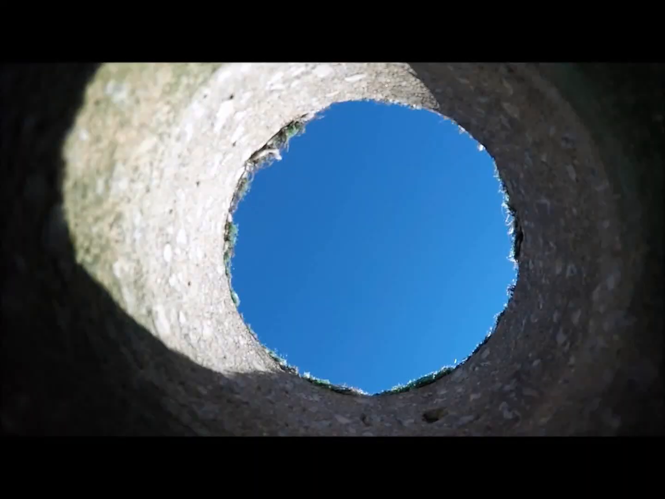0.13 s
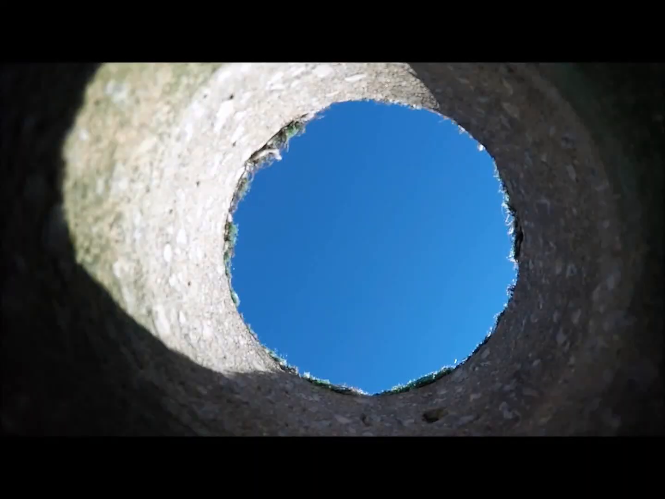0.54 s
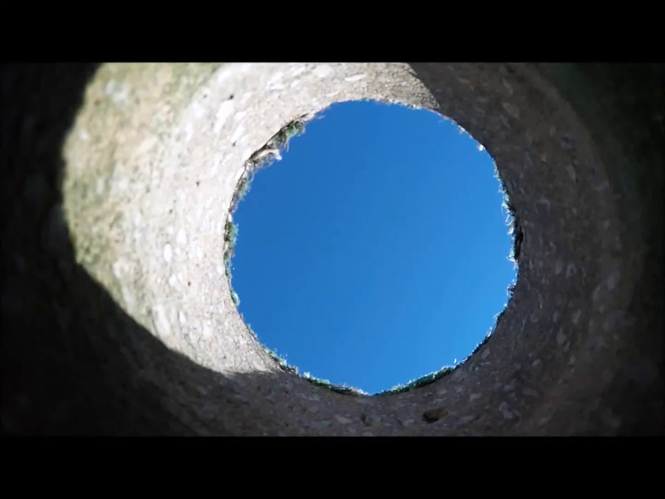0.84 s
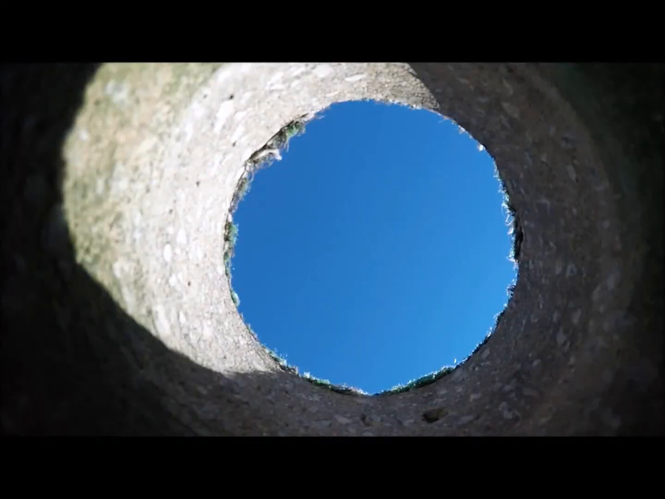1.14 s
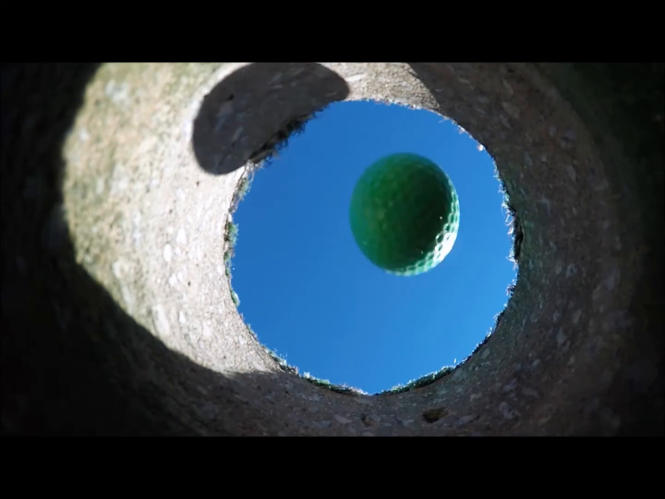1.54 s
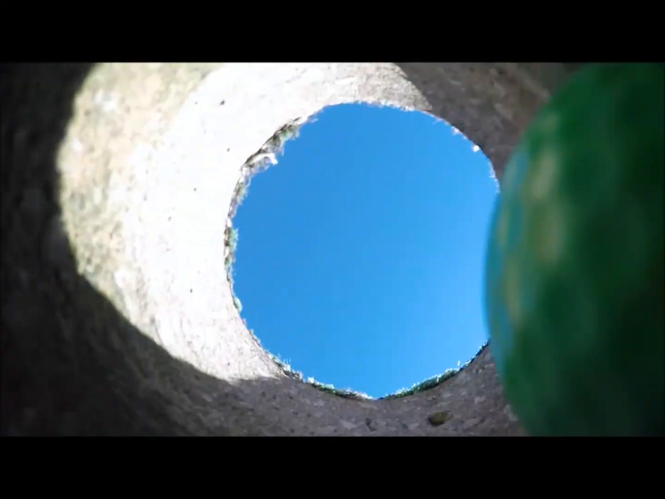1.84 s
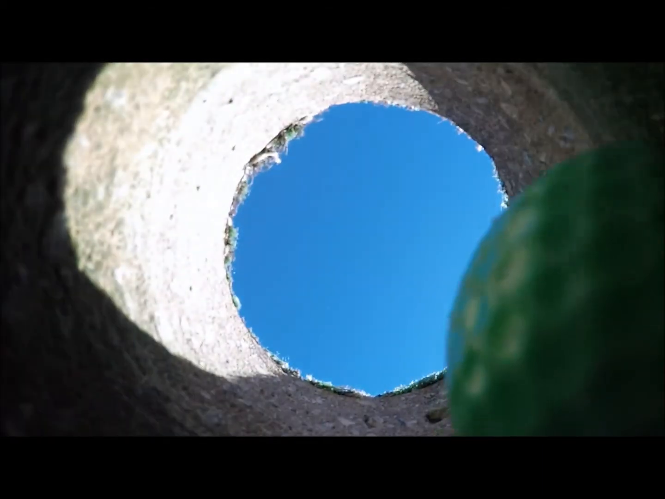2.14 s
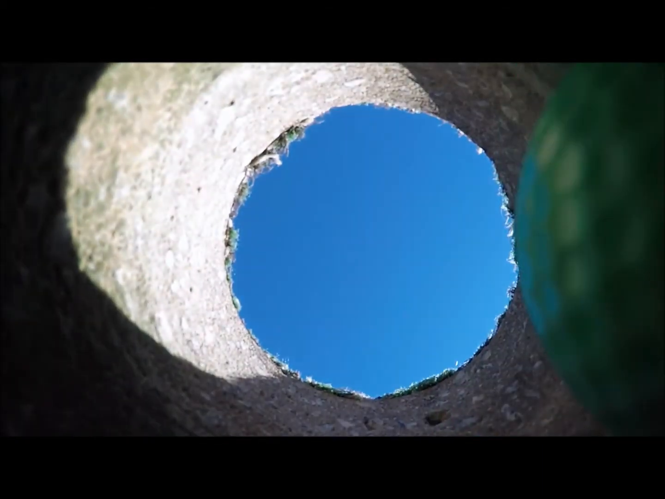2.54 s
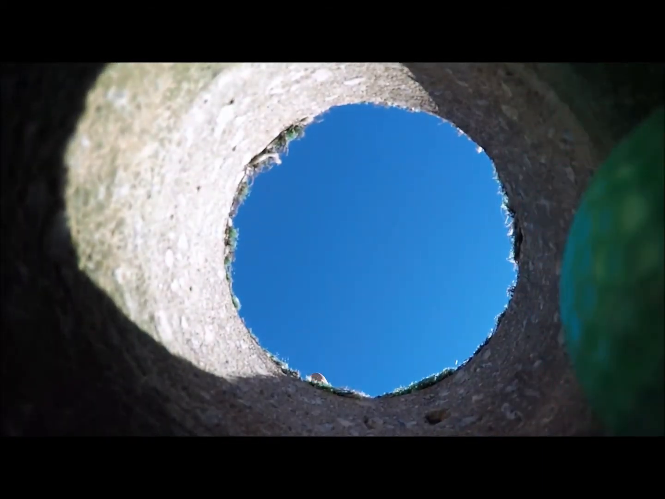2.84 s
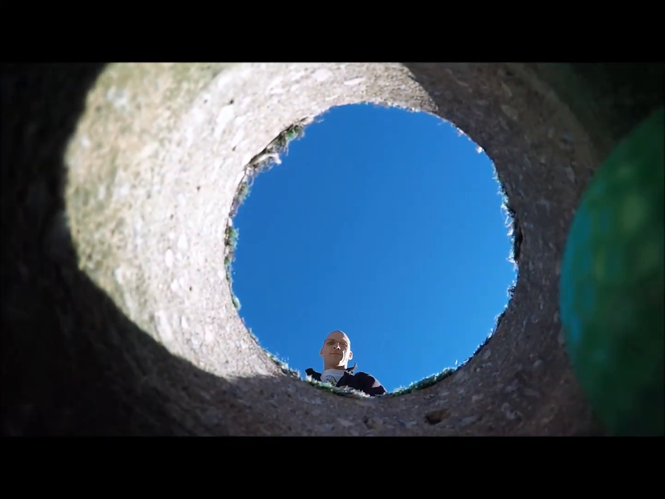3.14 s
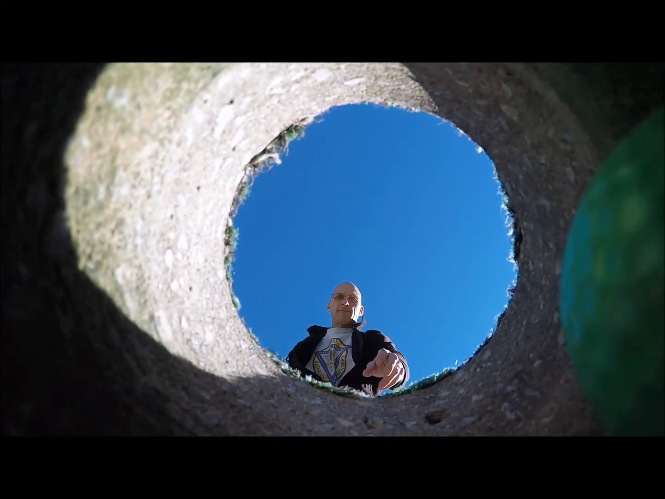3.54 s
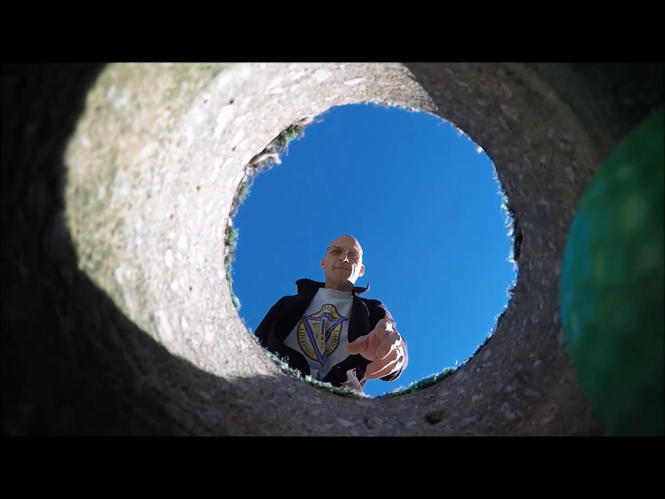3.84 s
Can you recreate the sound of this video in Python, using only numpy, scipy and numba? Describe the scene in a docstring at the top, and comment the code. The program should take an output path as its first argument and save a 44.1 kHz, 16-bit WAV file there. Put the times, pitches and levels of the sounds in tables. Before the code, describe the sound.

A golf ball drops into a hole, knocking hard and rattling to rest over low traffic rumble.

```python
"""Heard by a small camera lying at the bottom of a golf hole: traffic rumble (swelling noise bands, a drone, a whine)
runs throughout, and a distant hoarse bird (throbbing noise on a gliding tone) cries once at about 1 s.
From 1.5 s a ball drops in: hard knocks (damped sines and noise clicks) overload the microphone's converter, with ticks,
grit noise and low jolts of the camera, then rattles of closing rebounds until 2.8 s.
The gain control ducks after the blows and creeps back; at 3.8 s a step (a soft damped tone) lands beside the hole."""
import sys
import numpy as np
from scipy import signal
from scipy.fft import rfft, irfft
from scipy.io import wavfile
from scipy.ndimage import uniform_filter1d
from numba import njit

SR = 44100
rng = np.random.default_rng(int(sys.argv[2]) if len(sys.argv) > 2 else 0)


def gain_from_decibels(decibels):
    """Convert decibel values to linear amplitude factors."""
    exponent = np.asarray(decibels, float) / 20
    return 10 ** exponent


def store_wav(level_fs):
    """Save 16-bit WAV to argv[1]."""
    pcm = np.round(np.clip(np.atleast_2d(level_fs), -1, 1) * 32767)
    wavfile.write(sys.argv[1], SR, pcm.T.astype(np.int16))


N = 176400  # samples, 4 s


def decay(t, t60):
    """Envelope that falls 60 dB in t60 s."""
    return np.exp(-np.log(1000) * t / t60)


def sine(hz, t):
    """Steady tone starting at zero phase."""
    return np.sin(2 * np.pi * hz * t)


def level(x, db):
    """Scale to an rms level."""
    return x * gain_from_decibels(db) / np.sqrt(np.mean(x ** 2))


def add(out, s, x):
    """Mix x in at time s."""
    i = int(s * SR)
    out[i:i + len(x)] += x[:len(out) - i]


def walk(rate):
    """Random levels held 1 / rate s and slewed twice."""
    hold = int(SR / rate)
    steps = np.repeat(rng.standard_normal(N + 1)[:N // hold + 1], hold)
    return 0.76 * uniform_filter1d(uniform_filter1d(steps, hold), hold)[:N]


def shaped(gain):
    """Noise with the amplitude spectrum gain(Hz)."""
    hz = np.arange(N // 2 + 1) * SR / N + 1  # 1 Hz up, to keep clear of zero
    return irfft(rfft(rng.standard_normal(N)) * gain(hz), N)


def peak(centre_hz, width_hz):
    """Noise gathered round one pitch, half amplitude at the edges of its width."""
    return shaped(lambda f: 1 / (1 + ((f - centre_hz) / width_hz * 2) ** 2))


def ring(t, modes, chance):
    """Damped modes; chance shifts the level and pitch of each."""
    scatter_db, scatter_pitch = 3.5, 0.02
    out = 0
    for (hz, db, t60), (c, d) in zip(modes, chance):
        out = out + gain_from_decibels(db + scatter_db * c) * decay(t, t60) * sine(hz * (1 + scatter_pitch * d), t)
    return out


# Spectrum of the traffic as it reaches the bottom of the hole: (frequency [Hz], relative density [dB per Hz])
TRAFFIC_SPECTRUM = [(15, -41.5), (25, -8), (69, -5), (101, -2.5), (132, -0.5), (172, -9.5), (257, -8.5),
                    (374, -7.5), (477, -14), (545, -26.5), (712, -34), (1010, -37), (1320, -42.5),
                    (2260, -46.5), (2950, -52.5), (4530, -57), (6770, -66), (8610, -66), (15100, -74.5)]


def traffic():
    """Octave bands that swell together and flicker alone, an engine drone and a faint high whine."""
    rumble_db, drone_db, whine_db = -24, -28.5, -80  # rms; the drone then wavers
    hz, db = np.array(TRAFFIC_SPECTRUM).T
    rumble, swell = 0, walk(0.81)
    for mid in 30 * 2. ** np.arange(10):
        lowest = -1 if mid > 30 else 0  # the bottom band stays open downwards

        def band_gain(f):
            crossfade = np.cos(np.pi / 2 * np.clip(np.log2(f / mid), lowest, 1))
            return gain_from_decibels(np.interp(np.log(f), np.log(hz), db)) * crossfade

        rumble = rumble + shaped(band_gain) * gain_from_decibels(0.52 * swell + 0.24 * walk(6))
    drone = level(peak(77.7, 12), drone_db) * gain_from_decibels(0.8 * walk(1.1))
    whine = level(peak(8440, 120), whine_db)
    return level(rumble, rumble_db) + drone + whine


# Track of the distant bird's cry: (time [s], centre frequency [Hz], rms level [dB])
BIRD_TRACK = [(0.839, 1550, -66), (.87, 1650, -47.5), (.92, 1950, -45), (0.999, 2088, -48),
              (1.061, 1950, -53.5), (1.2, 1800, -66)]


def bird():
    """A distant rasping cry: throbbing noise on a tone that rises and sags."""
    width_hz, rasp_hz = 420, 85
    t = np.arange(N) / SR
    s, hz, db = np.array(BIRD_TRACK).T
    rough = shaped(lambda f: 1 / (1 + (f / width_hz * 2) ** 4)) * (1 + 0.27 * sine(rasp_hz, t))
    tone = np.sin(2 * np.pi * np.cumsum(np.interp(t, s, hz)) / SR)
    return level(rough * tone, 0) * gain_from_decibels(np.interp(t, s, db, -120, -120))


def step():
    """A step close beside the hole rings its air softly: one damped tone with a rounded start."""
    time_s, db, hz, rise_s, t60_s = 3.8245, 9.5, 420, 0.0035, 0.023
    out, t = np.zeros(N), np.arange(4096) / SR
    rise = (1 - np.exp(-t / rise_s)) ** 2
    add(out, time_s, gain_from_decibels(db) * rise * decay(t, t60_s) * sine(hz, t))
    return out


# Grit under the rolling ball, the last a shoe scuffing turf, before the scrape's unevenness:
# (time [s], length [s], level [dB])
SCRAPES = [(1.753, 0.059, -35.5), (1.822, 0.07, -38), (1.918, 0.041, -43), (2.39, 0.089, -46),
           (2.654, 0.036, -22.5), (3.826, 0.038, -55)]


def grit():
    """Uneven scraping noise that starts quickly and thins out."""
    low_hz, top_hz, uneven_db = 800, 4000, 9
    t = np.arange(N) / SR
    shape = 0
    for s, span, db in SCRAPES:
        shape = shape + gain_from_decibels(db) * np.interp(t, [s, s + .004, s + span], [0, 1, .3], 0, 0)
    scrape = shaped(lambda f: f / low_hz / (1 + f / low_hz) / (1 + (f / top_hz) ** 4))
    return shape * gain_from_decibels(uneven_db * walk(400)) * level(scrape, 0)


# Shoves of the camera body, the level before its rise and decay: (time [s], level [dB], swing frequency [Hz])
CAMERA_SHOVES = [(1.679, -8.5, 51.4), (1.743, 10, 67), (1.82, 10.5, 56), (1.883, 9.5, 60),
                 (2.322, -2.5, 58.7), (2.466, -2, 60), (2.66, -12.5, 60.4)]


def shoves():
    """The jolted camera swings low and dies away within a few swings."""
    rise_s, t60_s = 0.00079, 0.069
    out, t = np.zeros(N), np.arange(8192) / SR
    for s, db, hz in CAMERA_SHOVES:
        add(out, s, -gain_from_decibels(db) * (1 - np.exp(-t / rise_s)) * decay(t, t60_s) * sine(hz, t))
    return out


# Thin ticks after the big blows: (time [s], relative level [dB])
TICK_TIMES = [(1.7748, -9.5), (1.793, -23), (1.8455, -10), (1.9189, -6.5), (1.982, -9)]
# Modes that each tick rings: (frequency [Hz], relative level [dB], t60 [s])
TICK_MODES = [(2090, 3.5, .006), (5600, 0.5, 0.0052)]


def ticks():
    """Noise bursts of 3 ms, each ringing two short modes."""
    out, t = np.zeros(N), np.arange(4096) / SR
    for s, db in TICK_TIMES:
        touch = rng.standard_normal(len(t)) * (t < .003)
        tick = signal.fftconvolve(touch, ring(t, TICK_MODES, np.zeros((2, 2))))[:len(t)]
        add(out, s, gain_from_decibels(db) * tick / 30)
    return out


# Knocks of the ball at the camera; a gap of 1 ms or less gives no rebounds:
# (time [s], relative level [dB], knock frequency [Hz], treble against the knock [dB], first rebound gap [s])
BALL_KNOCKS = [(1.517, -30, 454, -22, 0.0004), (1.671, 7.5, 351.4, -19.5, 0), (1.676, -10.5, 400, -6, 0),
               (1.7406, 17, 624, -8, 0.00098), (1.743, 5.5, 810, -2, 0.0038), (1.7525, 5.5, 640, -17, 0),
               (1.8165, 18.5, 444, -6.5, 0.00046), (1.8236, -8.5, 900, -2, 0),
               (1.8802, 19.5, 470, -11, 0.0017), (1.8904, 14.5, 487, -13.5, 0.0031),
               (1.8997, 7.5, 460, -14.5, 0), (1.9058, 8.5, 450, -12.5, 0), (1.9115, -1, 440, -11, 0.0016),
               (1.9295, 5.5, 430, -12.5, 0.002), (1.9367, -6.5, 431, -16, .0075),
               (1.9711, 2, 420, -8, 0.00079), (1.976, -15.5, 420, -8.5, .005),
               (2.129, -11.5, 450, -11, .004), (2.2917, -15.5, 450, -9.5, 0.0027),
               (2.2948, -7, 447, -18, .003), (2.3213, 17, 466, -14.5, .008),
               (2.3808, -13.5, 450, -8, 0.0019), (2.386, 5.5, 484, -16, 0.0036),
               (2.4637, 16, 896, -25, 0.0015), (2.4732, 1.5, 437, -20, 0.0022),
               (2.493, -8, 400, -29.5, 0.0044), (2.609, -17, 400, -24, 0), (2.6568, 4.5, 408, -21, .006),
               (2.671, 10.5, 460, -18.5, 0.0014), (2.678, 1, 370, -21, .0054),
               (2.811, -4, 400, -14.5, 0.00067), (2.818, -3, 380, -25.5, .0052)]
# Modes of cup and casing, before each blow's scatter: (frequency [Hz], relative level [dB], t60 [s])
CUP_MODES = [(760, 9.5, .012), (1018, 7.5, 0.0089), (1370, 3.5, 0.0093), (1850, -4, 0.0042),
             (2415, 3, 0.0072), (3060, -1, 0.011), (4070, -3.5, 0.015), (4767, -1, 0.0099),
             (5367, -4, 0.012), (7500, -12.5, .006)]


def knock(t, hz):
    """The dull body of a blow: a damped knock and the air of the hole, pushed in smoothly."""
    cycles, push_s = 5.68, 0.0014  # cycles of the knock in its t60
    hole_hz, hole_db, hole_t60_s = 380, -16, 0.035
    push = 1 - np.exp(-t / push_s)
    dull = decay(t, cycles / hz) * sine(hz, t)
    hole_air = gain_from_decibels(hole_db) * decay(t, hole_t60_s) * sine(hole_hz, t)
    return -3 * push ** 1.1 * (dull + hole_air)


def click(t, blow_db, chance, noise):
    """A gritty touch rings cup and casing beside a noise crack; harder blows keep more treble."""
    touch_s, modes_db = 0.0005, -6.5  # touch_s: fall of the touch to 1/e
    crack_db, crack_t60_s, tail_db, tail_t60_s = -6, 0.007, -37, 0.055
    treble_hz, octaves_per_db = 5600, 0.022  # top of the treble at 0 dB, its rise with level
    touch = (0.5 + noise[:256]) * np.exp(-t[:256] / touch_s)
    touch = touch / np.sqrt(np.sum(touch ** 2))
    modes = np.convolve(ring(t, CUP_MODES, chance), touch)[:len(t)] * gain_from_decibels(modes_db)
    crack = noise * (gain_from_decibels(crack_db) * decay(t, crack_t60_s) + gain_from_decibels(tail_db) * decay(t, tail_t60_s))
    top_hz = np.clip(treble_hz * 2 ** (octaves_per_db * blow_db), 500, 18000)
    return signal.lfilter(*signal.butter(3, top_hz, fs=SR), modes + crack)


def ball():
    """Each contact adds a dull knock and a bright click; rebounds weaken, dull and close up."""
    rebounds, gap_ratio, rebound_db, treble_fade_db = 9, 0.86, -3, -1.63  # rebounds counts the first blow too
    out, t = np.zeros(N), np.arange(4096) / SR
    for s, db, hz, treble_db, gap in BALL_KNOCKS:
        for k in range(rebounds if gap > .001 else 1):
            chance = rng.standard_normal((len(CUP_MODES) + 1, 2))
            noise = rng.standard_normal(len(t))
            blow_db = db + k * rebound_db
            if k > 0:
                blow_db += chance[-1, 0]  # uneven by about 1 dB
            bright = gain_from_decibels(treble_db + k * treble_fade_db) * click(t, blow_db, chance, noise)
            add(out, s, gain_from_decibels(blow_db) * (knock(t, hz) + bright))
            s += gap * gap_ratio ** k
    return out


def scene():
    """Traffic, bird, step, grit, camera jolts, ticks and ball in one channel."""
    return (traffic() + bird() + step() + grit() + shoves() + ticks() + ball())[None]


@njit
def agc_db(x_db, start, release, lag):
    """Peak detector in dB with a steady release; the gain follows through two lags."""
    gain = np.empty(len(x_db))
    excess, first, second = 0., 0., 0.
    for i in range(len(x_db)):
        excess = max(excess - release, x_db[i] - start, 0.)
        first += (excess - first) * lag
        second += (first - second) * lag
        gain[i] = -second
    return gain


def roll_off(x):
    """The treble ends steeply here."""
    return signal.sosfilt(signal.butter(12, 15270, fs=SR, output="sos"), x)


def record(dry):
    """Slow gain control at the microphone, a trace of circuit hiss, then the converter clips with a soft knee."""
    start_db, release_db_s, lag_s, hiss_db, knee = -7.5, 17, 0.065, -90.5, 3
    input_db = 20 * np.log10(np.abs(dry[0]) + 1e-9)
    x = dry * gain_from_decibels(agc_db(input_db, start_db, release_db_s / SR, 1 / (lag_s * SR)))
    x = x + level(rng.standard_normal(N), hiss_db)
    clipped = x / (1 + np.abs(x) ** (2 * knee)) ** (.5 / knee)
    return roll_off(clipped)


dry = scene()
out = record(dry)
store_wav(out)
```